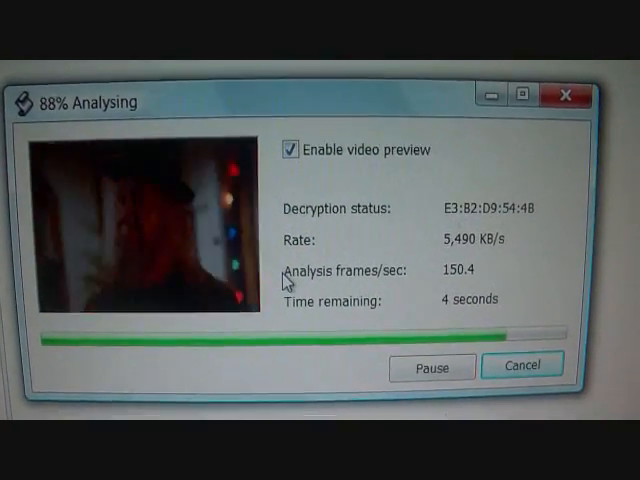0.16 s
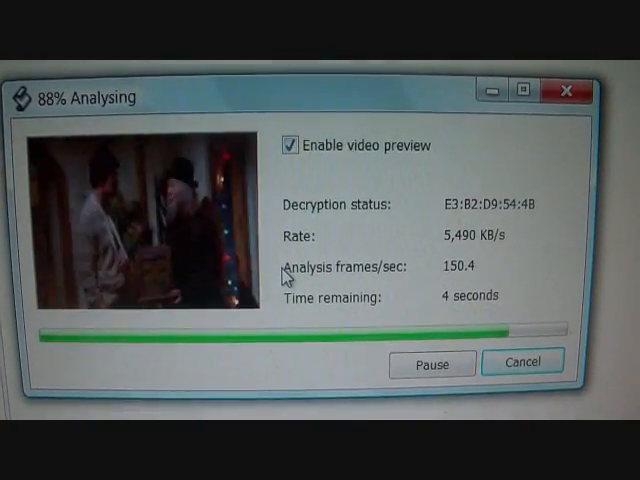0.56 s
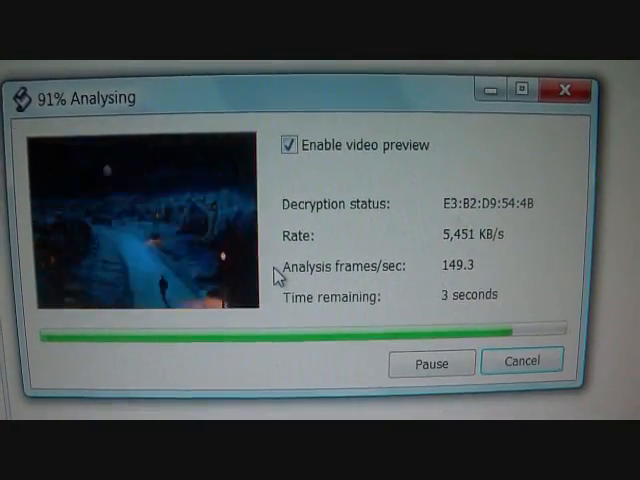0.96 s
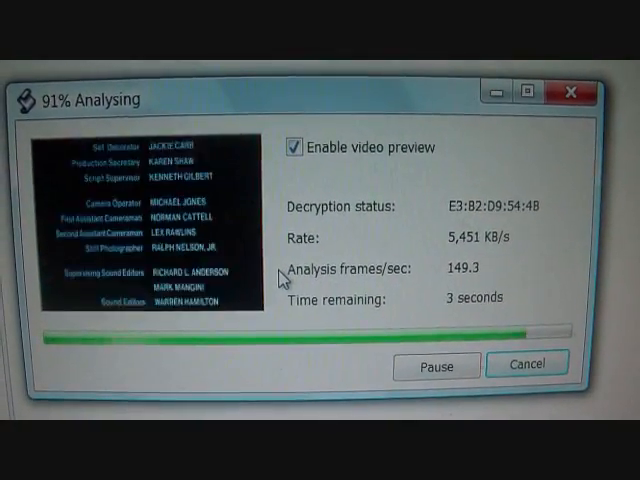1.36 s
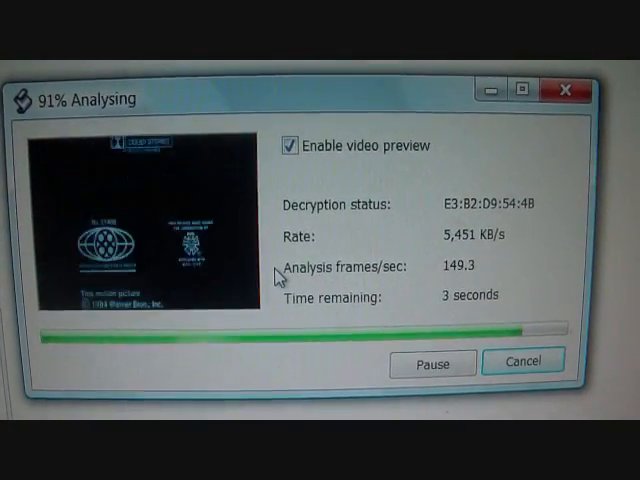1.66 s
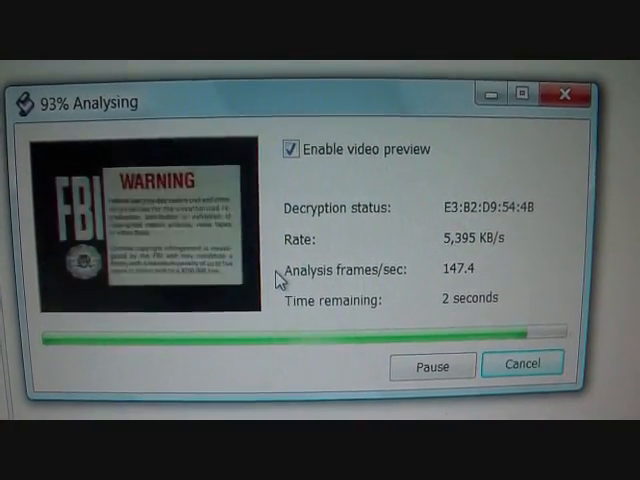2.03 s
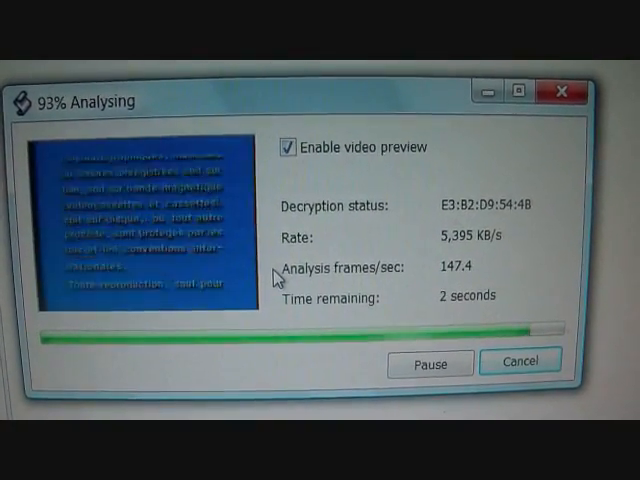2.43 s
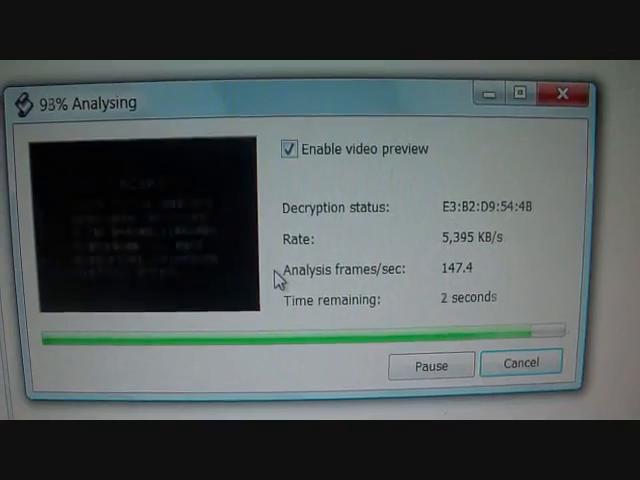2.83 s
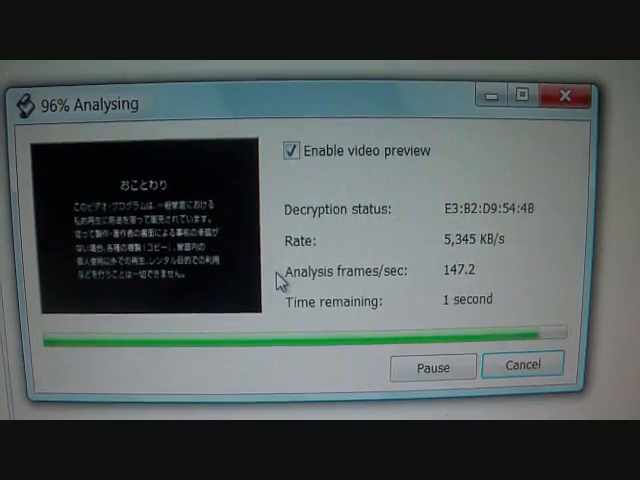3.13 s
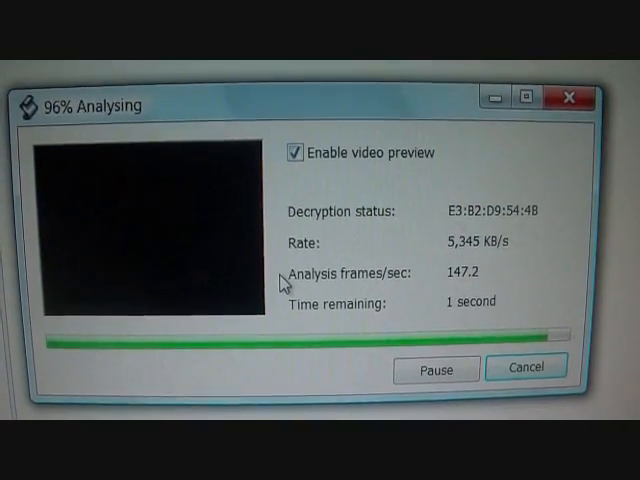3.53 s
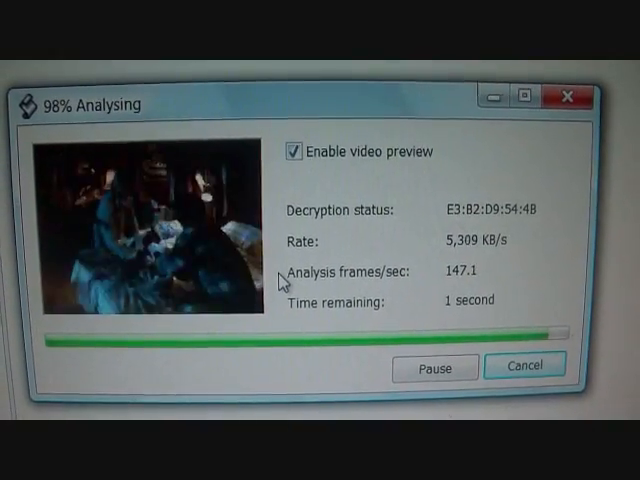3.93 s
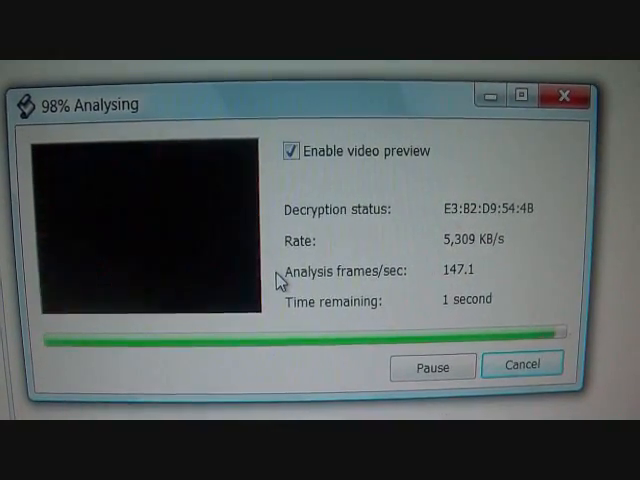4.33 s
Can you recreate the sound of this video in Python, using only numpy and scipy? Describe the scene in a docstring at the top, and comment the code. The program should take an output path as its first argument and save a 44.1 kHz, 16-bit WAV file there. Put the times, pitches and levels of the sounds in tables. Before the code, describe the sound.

A computer disc drive spins at speed with a steady hum and whine over soft rushing air, with a few faint plastic ticks.

```python
"""A steady hum and whine over a soft rush of air: a disc drive spins at about 4580 turns a minute.
The spindle hums on multiples of its turning rate, and the disc stirs air that rings the computer case.
A fan and the mains hum along, the desk rings low and the case drones in swells. Plastic parts tick
now and then. A low rumble, likely the hand holding the camera close by, grows towards the end."""
import sys
import numpy as np
from scipy import signal
from scipy.fft import rfft, irfft
from scipy.io import wavfile
from scipy.ndimage import uniform_filter1d

SR = 44100
rng = np.random.default_rng(int(sys.argv[2]) if len(sys.argv) > 2 else 0)


def dump_mix(stems):
    """Bounce the given channels to the path in sys.argv[1] as a 16-bit WAV at rate SR."""
    frames = np.atleast_2d(stems).T  # one column per channel
    limited = np.clip(frames, -1, 1)  # hard clip at full scale
    pcm = np.round(limited * 32767).astype(np.int16)
    wavfile.write(sys.argv[1], SR, pcm)


N = 197744
TIME = np.arange(N) / SR
BIN_HZ = np.maximum(np.fft.rfftfreq(N, 1 / SR), 1)  # the frequencies that noise is built from

# The spindle's hum. Each row: multiple of the turning rate, level in dB.
SPINDLE_TONES = [(3, -38.5), (4, -55), (5, -69.5), (8, -57), (12, -49.5), (13, -57), (21, -60), (24, -75.5),
                 (28, -65.5), (35, -65.5), (49, -80)]
# The slow drift of the whine. Each row: time in seconds, level in dB.
WHINE_LEVELS = [(0, -36.8), (.7, -36.5), (1.7, -35), (2.9, -35.5), (4.48, -36.5)]
# The rush of air around the disc. Each row: frequency in Hz, level in dB per Hz.
AIR_SPECTRUM = [(100, -64), (190, -72.5), (370, -78), (680, -76.5), (1200, -79.5), (1480, -80),
                (1900, -82.5), (2600, -83), (3300, -91), (4000, -104), (4450, -103), (5400, -92),
                (7500, -92.6), (8200, -110.5)]
# Where the case and tray ring. Each row: pitch in Hz, width in Hz, peak level in dB per Hz.
CASE_RESONANCES = [(163, 20, -71), (221.5, 18, -69.5), (289.6, 39, -63), (455.5, 52, -65),
                   (538.5, 79.5, -63.5), (593, 44, -70.5), (796, 73, -66.5), (1013, 170, -75),
                   (1129, 70, -71), (1747, 97, -75.5), (2110, 140, -79), (2326, 90, -78.5),
                   (3240, 260, -93), (6540, 350, -92)]
# Where the desk under the computer rings. Each row: pitch in Hz, width in Hz, peak level in dB per Hz.
DESK_RESONANCES = [(20, 4, -59.5), (39, 11, -51.5), (72, 9, -56), (101, 16, -67.5)]
# Swells of the case's drone. Each row: middle in seconds, half length in seconds, level in dB.
DRONE_SWELLS = [(.75, 0.48, -41.5), (1.76, 0.12, -39), (2.87, .25, -41)]
# The ticks. Each row: start in seconds, gain of the deep notes in dB, gain of the upper notes in dB,
# level of the scrape in dB, length of the scrape in seconds.
PLASTIC_TICKS = [(1.4996, -18.5, -23, -41, 0.0042), (2.0119, -23, -24.5, -48, 0.0041),
                 (2.366, -50, -47, -51, .007), (2.5955, -26.5, -30, -48.5, .004),
                 (2.652, -46, -45, -51, .009), (3.1709, -43, -21, -47.5, 0.0038),
                 (3.7476, -19.5, -19, -45, 0.0044)]
# The notes the plastic rings with. Each row: pitch in Hz, relative level in dB, fade time in seconds.
PLASTIC_NOTES = [(668, -12, 0.0065), (1016, 3, 0.0038), (1170, 0.5, 0.0026), (1316, -11, 0.0041)]
# Shifts of the hand on the camera. Each row: strongest moment in seconds, gain in dB.
HAND_SHIFTS = [(2.62, -38), (2.81, -31), (2.97, -33.5), (3.15, -35.5), (3.96, -30.5), (4.29, -24.5),
               (4.45, -22)]
# The rub of the hand. Each row: frequency in Hz, relative level in dB per Hz.
RUB_SPECTRUM = [(12, -47.5), (35, -27), (70, -30), (150, -44.5), (300, -60), (700, -81.5)]


def undb(db):
    """Turn decibels into a factor to multiply by."""
    return 10 ** (np.asarray(db) / 20)


def wander(rate):
    """A smooth random curve of typical size 1 that heads for a new value `rate` times a second."""
    hold = max(int(SR / rate), 1)
    steps = np.repeat(rng.standard_normal(N // hold + 2), hold)
    steps = steps[rng.integers(hold):][:N]
    smooth = uniform_filter1d(uniform_filter1d(steps, hold), hold)
    return (smooth - smooth.mean()) / smooth.std()


def turning(hz, drift):
    """The angle of a spinning part whose speed wanders by the small share `drift`."""
    speed = hz * (1 + drift * wander(1.99))
    return 2 * np.pi * (np.cumsum(speed) / SR + rng.random())


def tone(angle, db):
    """A pure tone with an average (rms) level of `db`, starting anywhere in its cycle."""
    return np.sqrt(2) * undb(db) * np.sin(angle + 2 * np.pi * rng.random())


def spectrum(points):
    """Power per Hz along a line that joins the (Hz, dB) points."""
    hz, db = np.transpose(points)
    return undb(np.interp(np.log(BIN_HZ), np.log(hz), db)) ** 2


def resonances(peaks):
    """Power per Hz with a steep peak at each pitch where an object rings."""
    power = 0
    for hz, width, db in peaks:
        off_pitch = (BIN_HZ ** 2 - hz ** 2) / (BIN_HZ * width)
        power += undb(db) ** 2 / (1 + off_pitch ** 2 / 2) ** 2
    return power


def noise(power):
    """Random noise shaped to the given power per Hz."""
    return irfft(rfft(rng.standard_normal(N)) * np.sqrt(power * SR / 2), N)


def throb(hz, drift, waver_db):
    """A low vibration of size about 1 whose pitch and strength are never steady."""
    pitch = hz * (1 + drift * wander(25))
    return tone(2 * np.pi * np.cumsum(pitch) / SR, waver_db * wander(18))


def spindle(angle, waver_db=-0.04, sway_db=1.02, flutter_db=1.27):
    """The unbalanced disc and the motor's poles shake the drive at multiples of the turning rate."""
    hum = sum(tone(multiple * angle, db + waver_db * wander(5.4)) for multiple, db in SPINDLE_TONES)
    whine_db = np.interp(TIME, *np.transpose(WHINE_LEVELS))
    whine_db = whine_db + sway_db * wander(5) + flutter_db * wander(23.96)
    return hum + tone(7 * angle, whine_db)  # the seventh multiple whines: the tray rings at that pitch


def air(angle, pulse_depth=0.053, flicker_db=0.95):
    """Air dragged round by the disc hisses, pulses a little with each turn and rings the case."""
    rush = noise(spectrum(AIR_SPECTRUM) / (1 + (50 / BIN_HZ) ** 4))  # weaker below 50 Hz
    rush *= 1 + pulse_depth * np.sin(angle)
    rush *= undb(flicker_db * wander(12))
    return rush + noise(resonances(CASE_RESONANCES))


def fan(blade_hz=303.7, level_db=-48, waver_db=2.5):
    """The passing blades make a tone so near the spindle's fourth multiple that the two pulse slowly."""
    return tone(turning(blade_hz, drift=0.0017), level_db + waver_db * wander(7.1))


def mains(hz=120):
    """The mains power hums on one steady note."""
    return tone(2 * np.pi * hz * TIME, db=-52.5)


def drone(resting_db=-48):
    """The desk rings low, and the case drones over it in a few smooth swells."""
    desk = noise(resonances(DESK_RESONANCES))
    swells = sum(undb(db) ** 2 * np.exp(-((TIME - middle_s) / half_s) ** 2)
                 for middle_s, half_s, db in DRONE_SWELLS)
    strength = np.sqrt(undb(resting_db) ** 2 + swells)
    return desk + strength * throb(hz=83.15, drift=0.064, waver_db=2.5)


def ticks(rise_s=0.00145, upper_from_hz=1090):
    """Plastic slips for a few milliseconds: a thin scrape, and a soft push that rings the part briefly."""
    out = np.zeros(N)
    t = np.arange(SR // 25) / SR
    push = 1 - np.exp(-(t / rise_s) ** 2)
    since_push = t - rise_s
    treble = signal.butter(3, [5000, 7700], "band", fs=SR, output="sos")
    for start_s, deep_db, upper_db, scrape_db, scrape_s in PLASTIC_TICKS:
        ring = 0
        for hz, db, fade_s in PLASTIC_NOTES:
            # where the part slips decides which of its notes ring most
            strength = undb(db + (upper_db if hz > upper_from_hz else deep_db))
            ring += strength * np.exp(-since_push / fade_s) * np.cos(2 * np.pi * hz * since_push)
        burst = rng.standard_normal(len(t)) * np.exp(-(t / scrape_s) ** 4)
        scrape = signal.sosfilt(treble, burst)
        scrape *= undb(scrape_db) / scrape[t < scrape_s].std()
        start = int(start_s * SR)
        out[start:start + len(t)] += push * ring + scrape
    return out


def hand_rumble(rise_s=0.045, fade_s=0.12, grip_from_s=2.52, grip_db=-38.5):
    """The hand rubs and rocks the camera: each shift builds quickly and dies away more slowly."""
    # from the first shift on, the grip stays a little restless
    power = undb(grip_db) ** 2 * np.clip((TIME - grip_from_s) / rise_s, 0, 1)
    for peak_s, db in HAND_SHIFTS:
        shape = np.exp(-np.where(TIME < peak_s, (peak_s - TIME) / rise_s, (TIME - peak_s) / fade_s))
        power += (undb(db) * shape) ** 2
    rocking = throb(hz=39.45, drift=0.08, waver_db=1.9)
    rub = noise(spectrum(RUB_SPECTRUM))
    return np.sqrt(power) * (rocking + rub)


def scene():
    """All the sounds add up at one microphone."""
    disc_angle = turning(hz=76.36, drift=0.000607)
    computer = spindle(disc_angle) + air(disc_angle) + fan() + mains() + drone()
    return (computer + ticks() + hand_rumble())[None]


def record(dry, top_hz=7850):
    """The camera cuts away the highest treble."""
    return signal.sosfilt(signal.cheby1(14, .1, top_hz, fs=SR, output="sos"), dry)


dry = scene()
out = record(dry)
dump_mix(out)
```